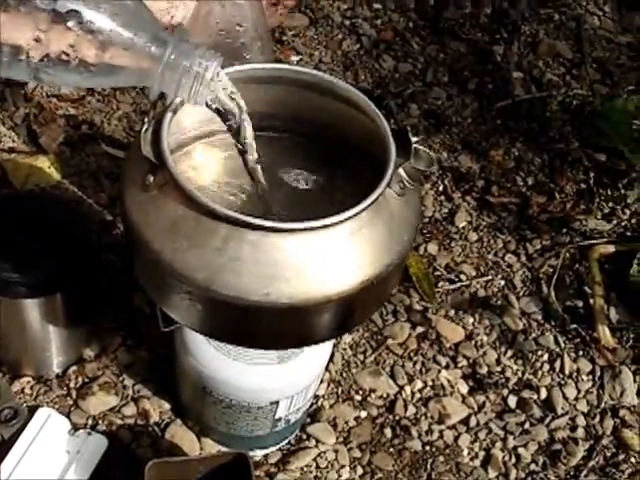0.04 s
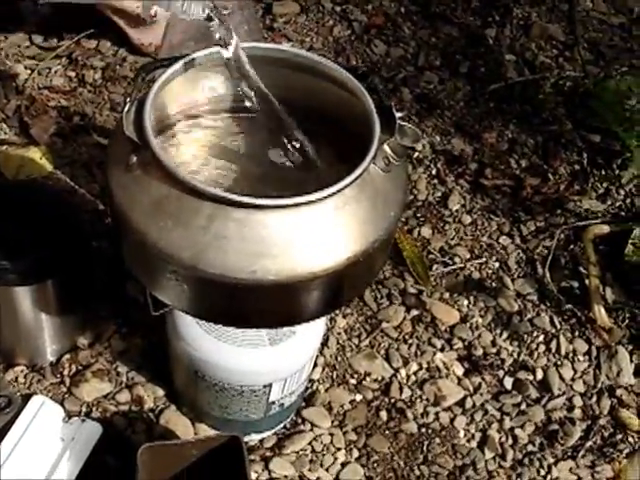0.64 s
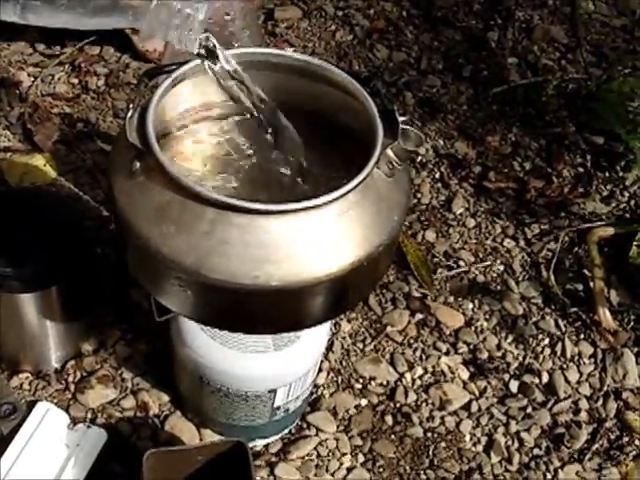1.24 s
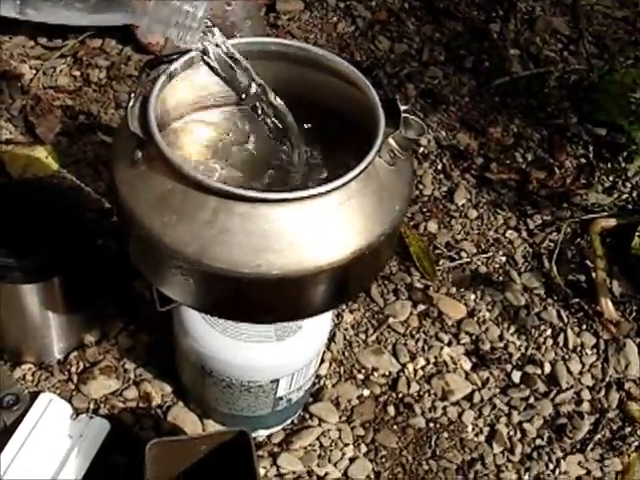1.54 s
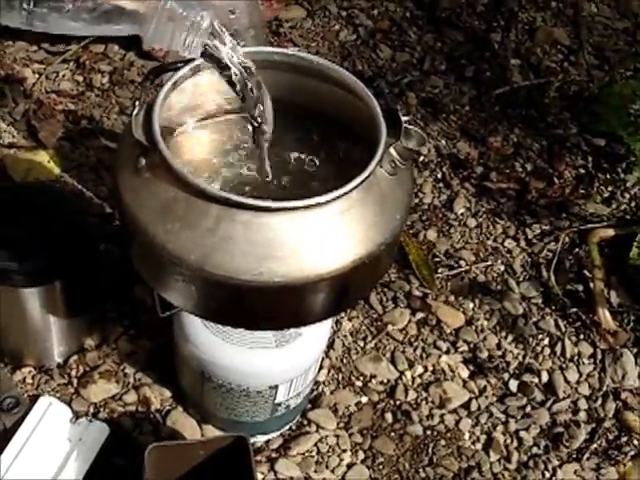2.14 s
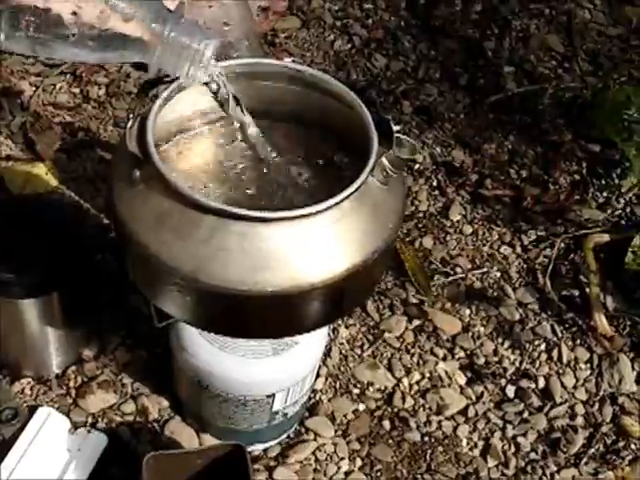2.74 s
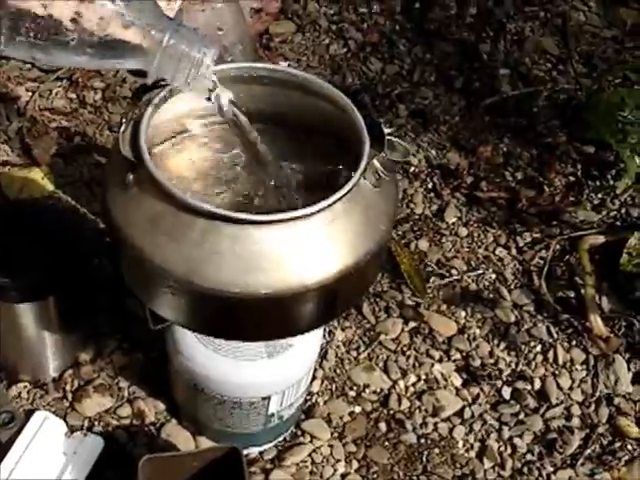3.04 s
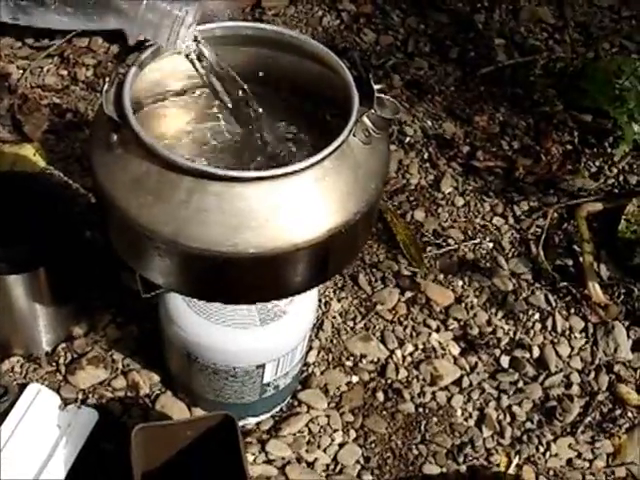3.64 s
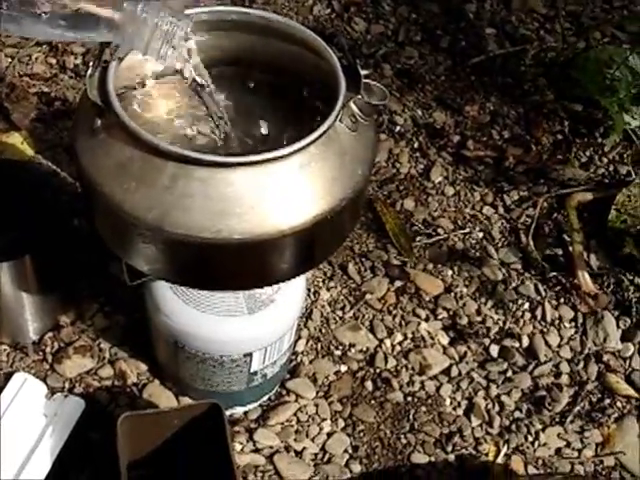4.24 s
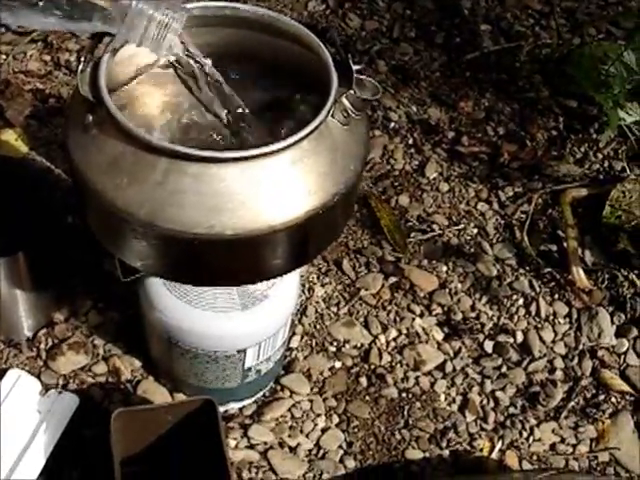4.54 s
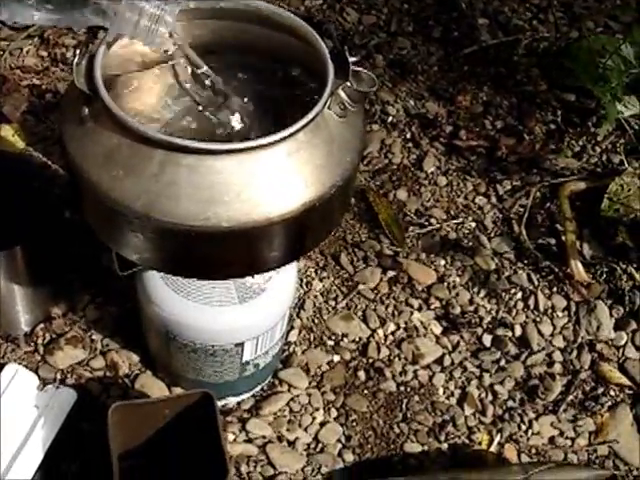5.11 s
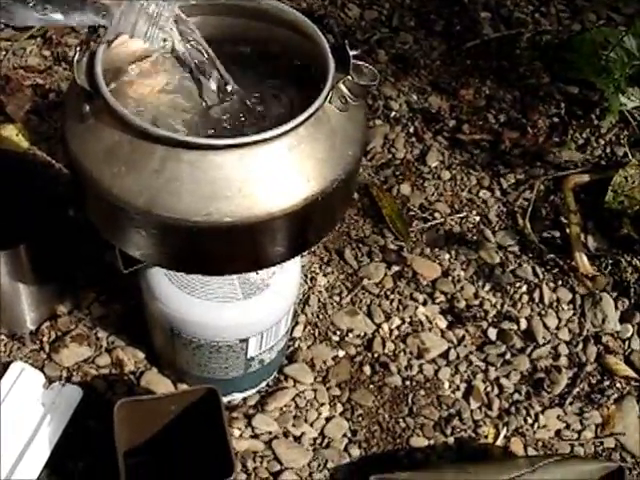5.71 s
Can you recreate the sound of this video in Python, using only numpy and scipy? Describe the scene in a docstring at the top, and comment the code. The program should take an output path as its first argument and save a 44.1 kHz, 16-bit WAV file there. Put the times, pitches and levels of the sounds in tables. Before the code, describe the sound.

Water pours from a plastic bottle into a half-full steel kettle, heard close up outdoors for about six seconds. It is already running lightly at the start, and from about 0.3 seconds it lands in uneven glugs, roughly six a second. Each glug churns the water, throws fizzy spray and sharp little drips, and traps bubbles that plop and rise in pitch. The kettle adds a hollow ring that shifts slightly as it fills. The pour grows fuller from about 0.8 seconds, with standout plops and splashes near 1.5, 1.9, 2.4, 2.9 and 3.7 seconds. A few stray drops thud softly on the microphone between 1.6 and 2.7 seconds. After about 4.5 seconds the pour is a little lighter but keeps gurgling to the end. Underneath are a soft rush of air and a very faint distant hum, which deepens slightly around 3 to 4 seconds.

```python
"""Glugging, splashing water, poured from a plastic bottle into a half-full steel kettle outdoors.
The bottle gulps air about six times a second, so the stream lands in slugs: each churns the water,
throws spray and traps bubbles that ring and rise in pitch. The kettle, on a camping stove, colours
the pour with its hollow. A few stray drops thud on the microphone, over a soft rush and a far hum."""
import sys
import numpy as np
from scipy import signal
from scipy.fft import rfft, irfft
from scipy.io import wavfile
from scipy.ndimage import uniform_filter1d, minimum_filter1d

SR = 44100
rng = np.random.default_rng(int(sys.argv[2]) if len(sys.argv) > 2 else 0)


def inscribe(sig):
    """Save sig as 16-bit PCM at rate SR to the path in sys.argv[1].

    A 1-D sig is mono; a 2-D sig holds one channel per row.
    Samples are clipped to [-1, 1] before scaling.
    """
    pcm = np.round(np.clip(np.atleast_2d(sig).T, -1, 1) * 32767)
    wavfile.write(sys.argv[1], SR, pcm.astype(np.int16))


N = 254456

# one slug of water for each gulp of the bottle: start_s, churn_db, spray_db
SLUGS = [(0.335, -32, -30.5), (0.374, -52, -31), (0.499, -29.5, -42), (0.678, -35.5, -28.5),
         (0.737, -31.5, -37.5), (0.84, -21.5, -23), (0.861, -31.5, -28), (0.981, -30, -30),
         (1.131, -41.5, -28.5), (1.296, -36.5, -30), (1.354, -23.5, -28), (1.477, -24.5, -25),
         (1.615, -23, -25), (1.789, -24, -23.5), (1.943, -16.5, -31), (2.097, -28, -25),
         (2.253, -24, -31.5), (2.414, -24, -30), (2.574, -21, -25), (2.737, -21.5, -27.5),
         (2.879, -32.5, -34.5), (3.075, -23, -32), (3.221, -16.5, -47), (3.387, -30, -36.5),
         (3.545, -26.5, -32), (3.714, -13, -46), (3.833, -34.5, -27), (3.862, -24.5, -26),
         (4.017, -26.5, -29), (4.192, -22.5, -38), (4.225, -27.5, -59), (4.367, -35.5, -27.5),
         (4.557, -31, -29.5), (4.754, -31, -36.5), (4.911, -29, -31), (5.107, -23.5, -32.5),
         (5.315, -32, -29), (5.494, -26.5, -41), (5.672, -40.5, -34.5), (5.763, -40, -43)]
# the unbroken stream between slugs: time_s, churn_db, spray_db
STEADY_STREAM = [(0, -45, -42.5), (0.35, -45, -36.5), (0.8, -40, -41), (1.0, -38, -34.5), (1.4, -38, -39),
                 (1.7, -42, -42), (2.4, -44.5, -38), (2.7, -47, -42), (4.5, -49, -42), (5.77, -53, -43)]
# balance of bubble sizes in the churn: pitch_hz, gain_db
CHURN_BALANCE = [(190, -16), (300, -11), (430, -12), (600, -0.5), (850, 7), (1150, -1.5), (1450, 3.5),
                 (1800, 6), (2400, -20)]
# balance of bubble sizes in the spray: pitch_hz, gain_db
SPRAY_BALANCE = [(1700, -13.5), (2300, -21), (3200, 9.5), (4200, 6), (5400, 2.5), (7000, 5.5), (9500, 9.5)]
# tone of the foam's hiss: frequency_hz, gain_db
FOAM_SPECTRUM = [(900, -2.5), (1800, 18), (3200, 7.5), (4500, 8.5), (6500, -16), (8500, -13), (10000, -19)]
# the loudest single bubbles: start_s, pitch_hz, level_db, ring_cycles
PLOPS = [(0.254, 1640, -22.5, 49), (0.2881, 1370, -13.5, 13), (0.549, 3270, -12.5, 18),
         (0.8171, 790, -16.5, 41), (0.8544, 835, -17.5, 55), (0.972, 2190, -23.5, 110),
         (1.122, 858, -16.5, 52), (0.86, 2590, -25, 86), (1.4724, 752, -8.5, 21), (1.471, 2900, -16, 60),
         (1.6873, 3250, -18.5, 45), (1.758, 1710, -21, 140), (1.7806, 816, -12, 21),
         (1.926, 774, -18.5, 39), (1.938, 1790, -21, 80), (2.126, 9030, -21, 140), (2.1419, 704, -17.5, 44),
         (2.2753, 3840, -14, 32), (2.4443, 907, -7.5, 43), (2.8805, 970, -17.5, 19), (2.936, 2810, -8, 51),
         (2.9375, 2060, -4.5, 19), (2.9922, 950, -19.5, 34), (3.0703, 3500, -6, 22),
         (3.1176, 3320, -21, 67), (3.215, 1490, -18, 32), (3.222, 1060, -15, 41), (3.323, 3200, -17.5, 22),
         (3.693, 2640, -18.5, 42), (3.7105, 3570, -7, 27), (3.7103, 1495, -14, 54), (3.713, 965, -8, 70),
         (3.7996, 3580, -19, 100), (3.8298, 1110, -15, 21), (3.8667, 1630, -16.5, 75),
         (3.933, 496, -24, 31), (4.1958, 1200, -16, 25), (4.2278, 988, -10, 74), (4.36, 3076, -19.5, 86),
         (4.557, 687, -20.5, 55), (4.644, 2160, -18.5, 34), (4.9035, 2210, -17.5, 70),
         (5.106, 1716, -15, 103), (5.276, 657, -19, 52), (5.448, 2340, -22.5, 68), (5.491, 1465, -27, 78)]
# large pockets of air that sing and burst: start_s, length_s, pitch_hz, level_db
AIR_POCKETS = [(1.925, 0.019, 1795, -10), (4.3495, 0.0084, 1840, -9), (4.5243, 0.0054, 2410, -16),
               (5.3597, 0.0074, 2240, -13)]
# hollows the stream drills in the water: start_s, length_s, from_hz, to_hz, level_db
HOLLOWS = [(0.216, 0.051, 730, 870, -32.5), (0.315, 0.097, 690, 764, -31), (0.665, 0.054, 707, 1000, -32),
           (0.875, 0.094, 706, 856, -36.5), (1.043, 0.055, 398, 926, -37.5), (1.133, 0.047, 766, 827, -30),
           (1.205, 0.061, 568, 1020, -34.5), (1.299, 0.1, 367, 968, -38), (1.328, 0.1, 744, 787, -31.5),
           (1.477, 0.095, 601, 888, -31), (1.617, 0.1, 611, 748, -40), (1.65, 0.053, 788, 950, -31.5),
           (1.872, 0.034, 810, 960, -32.5), (1.959, 0.078, 746, 740, -30), (2.091, 0.039, 747, 805, -33),
           (2.142, 0.029, 739, 925, -25.5), (2.288, 0.042, 825, 1130, -26.5), (2.292, 0.066, 710, 900, -34),
           (2.384, 0.025, 790, 800, -32.5), (2.494, 0.04, 502, 770, -41), (2.877, 0.035, 800, 1150, -26),
           (2.981, 0.04, 817, 1110, -31.5), (3.326, 0.028, 706, 1020, -32), (3.381, 0.044, 723, 1150, -31),
           (3.652, 0.024, 764, 1090, -37), (4.172, 0.042, 620, 930, -33.5), (4.921, 0.034, 651, 1215, -37),
           (5.111, 0.028, 767, 1460, -40), (5.656, 0.044, 693, 1410, -30.5)]
# drops that burst on the surface or the wall: start_s, level_db, brightness_hz
SLAPS = [(0.0263, -23.5, 4240), (0.29, -19, 3540), (0.3805, -49, 5530), (0.4444, -25, 5500),
         (0.4667, -17, 4630), (0.4883, -9.5, 3970), (0.609, -17, 1790), (0.6196, -16, 2950),
         (0.673, -11.5, 4540), (0.7023, -15.5, 4770), (0.7362, -16.5, 4870), (0.7757, -18.5, 4200),
         (0.829, -15, 5130), (0.842, -17, 4200), (1.149, -17.5, 4400), (1.1767, -17, 6900),
         (1.355, -22, 4840), (1.4908, -10, 3430), (1.53, -18.5, 5800), (1.617, -16.5, 3760),
         (1.65, -17.5, 3340), (1.7825, -9, 3170), (1.9275, -7, 3500), (1.951, -15.5, 3600),
         (1.97, -11.5, 1940), (2.003, -20, 4220), (2.0887, -26, 6500), (2.1078, -12.5, 6440),
         (2.145, -22, 1700), (2.255, -9.5, 5500), (2.417, -10.5, 3300), (2.4423, -21, 5600),
         (2.739, -9, 4700), (2.908, -22, 3300), (2.9353, -11.5, 3340), (3.0765, -12.5, 3380),
         (3.2136, -19.5, 1950), (3.2285, -10.5, 4760), (3.543, -14.5, 4900), (3.673, -20, 2080),
         (3.7121, -12, 3520), (3.8317, -19, 3780), (4.011, -19, 1870), (4.227, -19, 3000),
         (4.3695, -17.5, 6200), (4.383, -17.5, 5800), (4.5535, -21.5, 4870), (4.9092, -20.5, 4000),
         (5.325, -20.5, 6900), (5.4705, -16.5, 5930), (5.656, -17, 6900)]
# drops that land flat and hard: start_s, level_db, pitch_hz
FLAT_DROPS = [(0.6192, -19.5, 2540), (1.004, -20, 880), (1.152, -20.5, 885), (1.302, -22, 770),
              (1.605, -19.5, 970), (1.949, -16, 810), (2.094, -21, 855), (2.1435, -17, 895),
              (2.5705, -18, 834), (3.08, -18.5, 746), (3.584, -17, 950), (4.173, -24, 716),
              (4.2504, -21.5, 900), (4.371, -23, 790), (4.4166, -28.5, 685), (4.5529, -15.5, 860),
              (4.605, -20.5, 840), (4.911, -22, 840), (5.086, -22, 890), (5.154, -26.5, 1010),
              (5.277, -20.5, 825), (5.4696, -17, 930), (5.5308, -24, 970), (5.656, -24.5, 1110),
              (5.763, -18, 560)]
# air modes of the kettle, shifting as it fills: from_hz, to_hz, width_hz, gain_db
AIR_MODES = [(560, 560, 30, -1), (672, 590, 46, 1.5), (747, 710, 36, 3), (874, 842, 45, -4.5),
             (910, 1000, 31, 0), (1087, 1400, 40, -2), (1186, 1245, 33, -1.5), (1426, 1455, 16, 5.5),
             (1706, 1900, 24.5, 3.5), (1776, 1900, 55, -3), (2686, 2500, 65, 6), (3100, 2800, 144, 7.5),
             (3307, 3750, 47, -1.5), (4110, 4410, 113, -11.5)]
# drops that hit the microphone: start_s, level_db
STRAY_DROPS = [(1.614, -24), (2.104, -31), (2.254, -39), (2.737, -25), (2.936, -55)]
# tone of the outdoor rush: frequency_hz, gain_db
RUSH_SPECTRUM = [(25, -5.5), (60, 0), (120, 4), (220, 11.5), (400, 10), (700, 9.5), (1100, 14.5), (1800, 7),
                 (2600, -29), (4500, -32), (6500, -13), (7400, 1), (8300, -12), (10000, -29.5)]
# partials of a far-off hum: pitch_hz, level_db
HUM_PARTIALS = [(142, -67), (213, -66.5)]
# a lower drone that comes and goes: time_s, level_db
DRONE = [(0, -103), (2.7, -73.5), (3.1, -62), (3.9, -62), (4.5, -72), (5.77, -69)]

MIDDLING_DB = -23   # a slug of middling weight
BUBBLE_RISE_PER_S = 3   # pitch climb, in multiples of the starting pitch
CUTOFF_HZ = 10150


def churn(steady_db):
    """The body of the pour: plunging water beats in mid-sized bubbles, more under a heavy slug."""
    level = surges([(s, db) for s, db, _ in SLUGS], steady_db, middling_t60=0.18, swell=0.19)
    cloud = bubble_cloud(900 * np.sqrt(rms_one(level)), CHURN_BALANCE, cycles=18, spread_db=3.5, count=36)
    body = level * evened(cloud, span_s=0.013)
    return from_db(-6.5) * (body + kettle_modes(body))


def spray(steady_db):
    """The top end: tiny bubbles fizz with each slug, leaving mostly a wash of foam in between."""
    lead_s, t60 = 0.003, 0.11   # a slug's thin front sprays before its bulk lands
    bursts = [(s - lead_s, db) for s, _, db in SLUGS]
    level = surges(bursts, steady_db - 11, t60, swell=0.13)
    fizz = bubble_cloud(2000 * rms_one(level), SPRAY_BALANCE, cycles=69, spread_db=9.5, count=40)
    fizz = evened(fizz + from_db(6) * kettle_modes(fizz), span_s=0.0092)
    hiss = foam(patchy_db=4.5, patches_per_s=110, bands=9)
    wash = surges(bursts, steady_db, t60, swell=0.11) * hiss
    wash += from_db(-10) * kettle_modes(wash)
    return from_db(-4) * level * fizz + from_db(-5.5) * wash


def surges(bursts, steady_db, middling_t60, swell):
    """Envelope of the stream and its slugs: heavy ones land tight, light ones are strung out."""
    power, t = from_db(steady_db) ** 2, clock()
    for s, level_db in bursts:
        t60 = middling_t60 * 2 ** ((MIDDLING_DB - level_db) / 19)   # halves for every 19 dB more
        near = slice(max(0, int((s - swell * t60) * SR)), int((s + t60) * SR))
        age = t[near] - s
        power[near] += (from_db(level_db) * fade(np.maximum(age, -age / swell), t60)) ** 2
    return np.sqrt(power)


def bubble_cloud(per_s, balance, cycles, spread_db, count):
    """Small bubbles born at random, each ringing for some cycles at one of `count` pitches."""
    born = np.flatnonzero(rng.random(N) < per_s / SR)
    accent_db = spread_db * np.minimum(rng.exponential(1, N), 4)
    strength = (from_db(accent_db) * rng.choice([-1, 1], N))[born]
    pitch_index, out = rng.integers(0, count, N)[born], np.zeros(N)
    for k, hz in enumerate(np.geomspace(balance[0][0], balance[-1][0], count)):
        clicks = np.zeros(N)
        clicks[born[pitch_index == k]] = strength[pitch_index == k]
        width_hz = np.log(1000) / np.pi * hz / cycles
        ring = resonance(clicks, hz, width_hz)
        rounded = resonance(ring, hz, hz / 2)   # a bubble takes a cycle or so to get going
        out += from_db(at_hz(balance, hz)) * rounded / np.sqrt(width_hz)
    return rms_one(out)


def foam(patchy_db, patches_per_s, bands):
    """Countless bursting bubbles merge into a hiss that swells and sinks in each band on its own."""
    out, edges = 0, np.geomspace(1500, CUTOFF_HZ, bands + 1)
    hisses = coloured_noise(FOAM_SPECTRUM), coloured_noise(FOAM_SPECTRUM)
    for k, band in enumerate(zip(edges, edges[1:])):
        out += filtered(hisses[k % 2], band, "band") * from_db(patchy_db * drift(patches_per_s))
    return rms_one(out)


def single_bubbles(bubbles, pinch_share):
    """Each bubble blooms as it pinches off, then bends up in pitch as it nears the surface."""
    out, age = np.zeros(N), clock()[:SR // 6]
    for s, hz, level_db, cycles in bubbles:
        turns = hz * (age + BUBBLE_RISE_PER_S * age ** 2 / 2)
        attack = 1 - np.exp(-turns / (pinch_share * cycles))
        add(out, s, from_db(level_db) * attack * fade(age, cycles / hz) * np.sin(2 * np.pi * turns))
    return out


def air_pockets(taper):
    """A pocket's note swells as it is squeezed and stops when it breaks the surface."""
    out = np.zeros(N)
    for s, length_s, hz, level_db in AIR_POCKETS:
        age = np.arange(int(length_s * SR)) / SR
        turns = hz * (age + BUBBLE_RISE_PER_S * age ** 2 / 2)
        swell = np.sin(np.pi * age / length_s) ** taper
        add(out, s, from_db(level_db) * swell * np.sin(2 * np.pi * turns))
    return out


def hollows(taper, bend, rough_share, width_hz):
    """Turbulence keeps the air in each hollow ringing: a rough note, mostly climbing as it closes."""
    out = np.zeros(N)
    real, imaginary = filtered(rng.standard_normal((2, N)), width_hz)
    turbulence = rms_one(real) + 1j * rms_one(imaginary)
    drive = np.sqrt(1 - rough_share) + np.sqrt(rough_share / 2) * turbulence
    for s, length_s, from_hz, to_hz, level_db in HOLLOWS:
        stirred = drive[int(s * SR):][:int(length_s * SR)]
        closed = (np.arange(len(stirred)) + .5) / len(stirred)
        pitch = from_hz * (to_hz / from_hz) ** (closed ** bend)
        tone = np.real(stirred * np.exp(2j * np.pi * np.cumsum(pitch) / SR))
        add(out, s, from_db(level_db) * rms_one(tone * np.sin(np.pi * closed) ** taper))
    return from_db(-2) * out


def gurgles(steady_db, low_hz, high_hz, rise, t60, count):
    """The stream drags down overlapping bubbles: some hold their pitch or sag, most glide upward."""
    out, age = np.zeros(N), clock()[:SR // 6]
    envelope = (1 - fade(age, 0.055)) * fade(age, t60)
    for k, (when, height, speed) in enumerate(rng.random((count, 3))):
        hz = low_hz * (high_hz / low_hz) ** height
        turns = hz * (age + rise * (speed - .2) * age ** 2 / 2)
        add(out, (k + when) / count * N / SR, envelope * np.sin(2 * np.pi * turns))
    # a stronger stream traps more air
    return from_db(steady_db - 7 + 0.046 * (steady_db - steady_db.mean())) * rms_one(out)


def splats(slaps, t60, opening_s, breadth, mist_db):
    """A drop's slap snaps open into a broad crack with a puff of mist; brighter ones get more mist."""
    out, age = np.zeros(N), clock()[:SR // 25]
    envelope = (1 - np.exp(-age / opening_s)) * fade(age, t60)
    envelope /= envelope.max()
    for s, level_db, hz in slaps:
        white = rng.standard_normal((2, len(age)))
        crack = rms_one(resonance(resonance(white[0], hz, breadth * hz), hz, breadth * hz))
        mist = from_db(mist_db) * hz / 4000 * rms_one(resonance(white[1], 5300, 1500))
        add(out, s - opening_s, from_db(level_db) * evened(crack + mist, span_s=0.00015) * envelope)
    return from_db(-12) * (out + kettle_modes(out))


def knocks(front_s, cycles, ring_db):
    """A flat landing: a steep pressure front and a few dying swings, with the kettle ringing on."""
    out, age = np.zeros(N), clock()[:SR // 25]
    for s, level_db, hz in FLAT_DROPS:
        pulse = -(1 - np.exp(-age / front_s)) * fade(age, cycles / hz) * np.cos(2 * np.pi * hz * age)
        add(out, s, from_db(level_db) * pulse / np.abs(pulse).max())
    return out + from_db(ring_db) * kettle_modes(out)


def flung_drops(per_slug, ahead_s, flight_s, spread_db):
    """Lesser drops around each slug, louder the more it sprays: start_s, level_db, brightness_hz."""
    slug_s, _, spray_db = np.repeat(SLUGS, per_slug, axis=0).T
    flight, weight, brightness = rng.random((len(slug_s), 3)).T
    level_db = -34 + 0.11 * (spray_db - MIDDLING_DB) + spread_db * (2 * weight - 1)
    hz = 4020 * 2 ** (1.325 * brightness - .55)
    return list(zip(slug_s - ahead_s + flight_s * flight, level_db, hz))


def spatter(count, floor_db, spread_db, low_hz, high_hz):
    """The finest droplets, a dry crackle all through the pour: start_s, level_db, brightness_hz."""
    when, weight, brightness = rng.random((count, 3)).T
    level_db = floor_db - spread_db * np.log(np.maximum(weight, .02))
    return list(zip(when * N / SR, level_db, low_hz * (high_hz / low_hz) ** brightness))


def kettle_modes(x):
    """The hollow ring of the air in the kettle; its modes slide as the water rises."""
    out, blocks = 0, np.array_split(x + 1e-18, 24)
    for from_hz, to_hz, width_hz, gain_db in AIR_MODES:
        r = np.exp(-np.pi * np.clip(width_hz, 12, from_hz / 20) / SR)
        state, rung = np.zeros(2), []
        for block, hz in zip(blocks, np.linspace(from_hz, to_hz, len(blocks))):
            poles = [1, -2 * r * np.cos(2 * np.pi * hz / SR), r * r]
            part, state = signal.lfilter([1, 0, -1], poles, block, zi=state)
            rung.append(part)
        out += from_db(gain_db) * (1 - r * r) / 2 * np.concatenate(rung)
    return out


def kettle_walls(x, t60, wet_db):
    """A tight reverb of dense reflections between the steel walls."""
    age = clock()[:SR // 5]
    tail = rng.standard_normal(len(age)) * fade(age, t60) * (age > .001)
    tail = filtered(tail, [600, 4000], "band")
    return from_db(wet_db) * signal.fftconvolve(x, tail / np.linalg.norm(tail))[:N]


def thuds(pitch_hz, t60):
    """A drop on the microphone housing gives one dull pressure pulse."""
    out, age = np.zeros(N), clock()[:SR // 5]
    for s, level_db in STRAY_DROPS:
        add(out, s, from_db(level_db) * fade(age, t60) * np.sin(2 * np.pi * pitch_hz * age + 1))
    return filtered(out, 130)


def outdoors(rush_db, drone_hz):
    """The bed: a smooth rush of air, a far-off wavering hum and a drone beneath it."""
    rush = from_db(rush_db) * coloured_noise(RUSH_SPECTRUM)
    phase = 2 * np.pi * np.cumsum(1 + 0.0073 * drift(4)) / SR
    hum = sum(from_db(db + 0.97 * drift(6.7)) * np.sin(hz * phase) for hz, db in HUM_PARTIALS)
    drone = from_db(in_time(DRONE)[0]) * np.sin(drone_hz * phase)
    return rush + np.sqrt(2) * (hum + drone)


def from_db(db):
    """Decibels to gain."""
    return 10 ** (np.asarray(db) / 20)


def rms_one(x):
    """Scale to unit power."""
    return x / np.sqrt(np.mean(x ** 2) + 1e-20)


def clock():
    """Time of every sample in s."""
    return np.arange(N) / SR


def in_time(rows):
    """Each column of an automation curve at every sample."""
    s, *columns = np.transpose(rows)
    return [np.interp(clock(), s, c) for c in columns]


def at_hz(points, hz):
    """Read a spectrum on a log-frequency axis."""
    point_hz, gain_db = np.transpose(points)
    return np.interp(np.log(hz), np.log(point_hz), gain_db)


def fade(age, t60):
    """Exponential decay by 60 dB in t60 seconds."""
    return np.exp(-np.log(1000) * age / max(t60, 1e-3))


def add(track, s, sound):
    """Mix a sound into the track at time s."""
    start = int(np.clip(s * SR, 0, N - 1))
    track[start:start + len(sound)] += sound[:N - start]


def drift(per_s):
    """Random wander of spread 1."""
    knots = rng.standard_normal(1000)
    return rms_one(np.interp(clock() * per_s, np.arange(len(knots)), knots))


def filtered(x, hz, kind="low"):
    """Gentle filter, 12 dB per octave."""
    return signal.sosfilt(signal.butter(2, hz, kind, fs=SR, output="sos"), x)


def resonance(x, hz, width_hz):
    """Two-pole band-pass with gain 1 at its centre."""
    r = np.exp(-np.pi * width_hz / SR)
    poles = [1, -2 * r * np.cos(2 * np.pi * hz / SR), r * r]
    return signal.lfilter(np.array([1, 0, -1]) * (1 - r * r) / 2, poles, x + 1e-18)


def evened(x, span_s):
    """Hold the power near 1 over a short span, keeping the grain inside it."""
    power = np.abs(uniform_filter1d(x ** 2, max(int(span_s * SR), 2)))
    return x / np.sqrt(power + 0.0016 * np.mean(x ** 2))


def coloured_noise(spectrum):
    """Noise of unit power with the given spectrum."""
    hz = np.maximum(np.arange(N // 2 + 1) * SR / N, 1)
    return rms_one(irfft(rfft(rng.standard_normal(N)) * from_db(at_hz(spectrum, hz)), N))


def scene():
    """The mono mix: water in the kettle, stray drops and the open air."""
    churn_db, spray_db = in_time(STEADY_STREAM)
    drops = flung_drops(per_slug=3, ahead_s=0.012, flight_s=0.06, spread_db=4)
    tinkles = [(s, hz, db + 5, 45) for s, db, hz in drops]   # each traps a tiny bubble of 45 cycles
    notes = single_bubbles(PLOPS + tinkles, pinch_share=0.017) + air_pockets(taper=0.54)
    notes += hollows(taper=0.13, bend=1.593, rough_share=0.6, width_hz=60)
    water = notes + from_db(-34.5) * kettle_modes(notes) + churn(churn_db)
    water += gurgles(churn_db, low_hz=450.4, high_hz=1150, rise=9, t60=0.075, count=130)
    water += spray(spray_db)
    droplets = spatter(count=280, floor_db=-39, spread_db=3.3, low_hz=4200, high_hz=8400)
    water += splats(SLAPS + drops + droplets, t60=0.021, opening_s=0.0012, breadth=0.6, mist_db=-3.5)
    water += knocks(front_s=0.00004, cycles=5, ring_db=3)
    water += kettle_walls(water, t60=0.14, wet_db=-19)
    return (water + thuds(pitch_hz=28, t60=0.021) + outdoors(rush_db=-43.5, drone_hz=101))[None]


def record(dry):
    """A fast limiter holds down the loudest plops; the top is cut steeply."""
    ceiling, span = .5, int(.004 * SR)
    allowed = ceiling / np.maximum(np.abs(dry), ceiling)
    gain = uniform_filter1d(minimum_filter1d(allowed, span), span)
    return signal.sosfilt(signal.ellip(10, .1, 70, CUTOFF_HZ, fs=SR, output="sos"), gain * dry)


dry = scene()
out = record(dry)
inscribe(out)
```